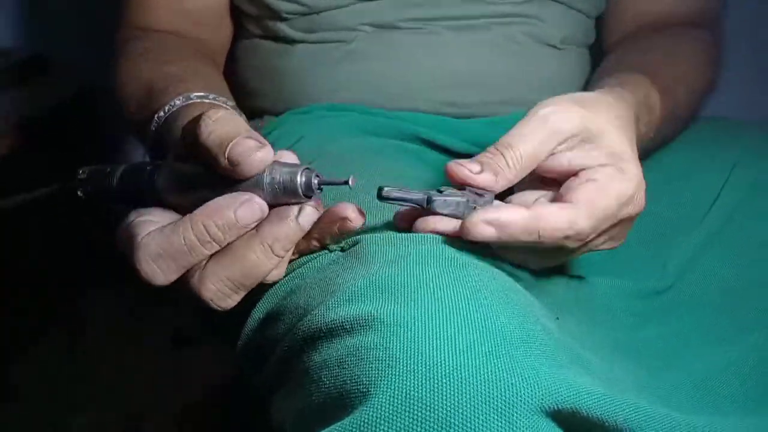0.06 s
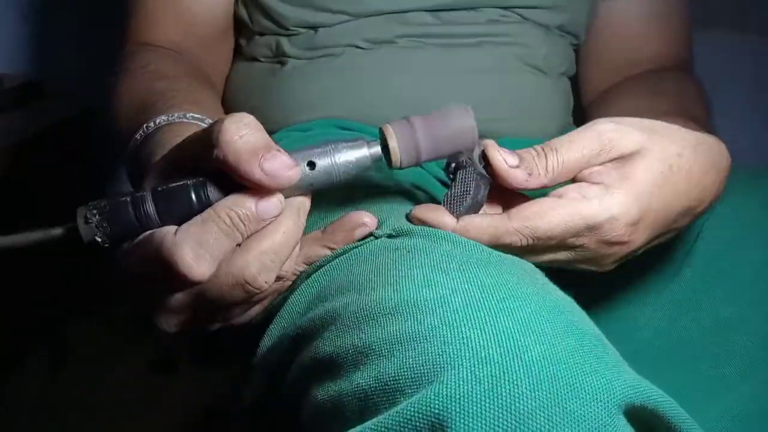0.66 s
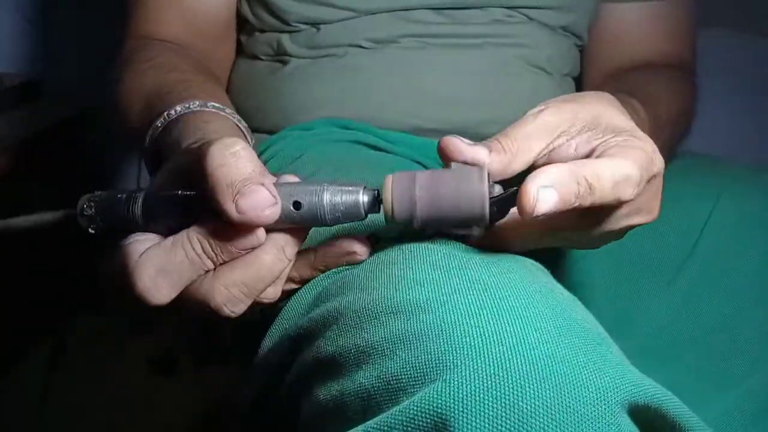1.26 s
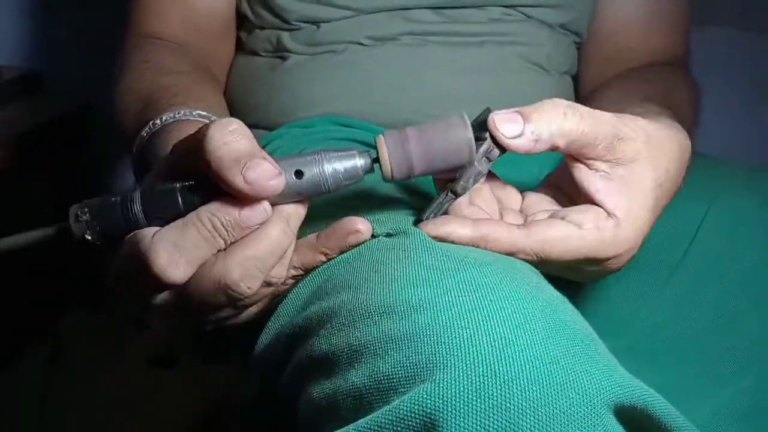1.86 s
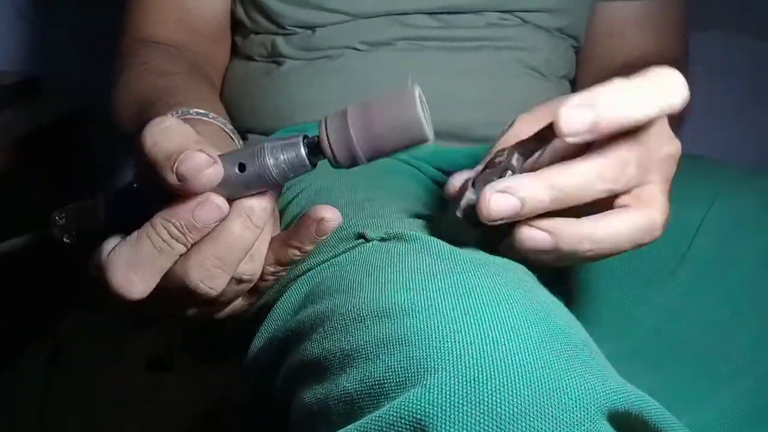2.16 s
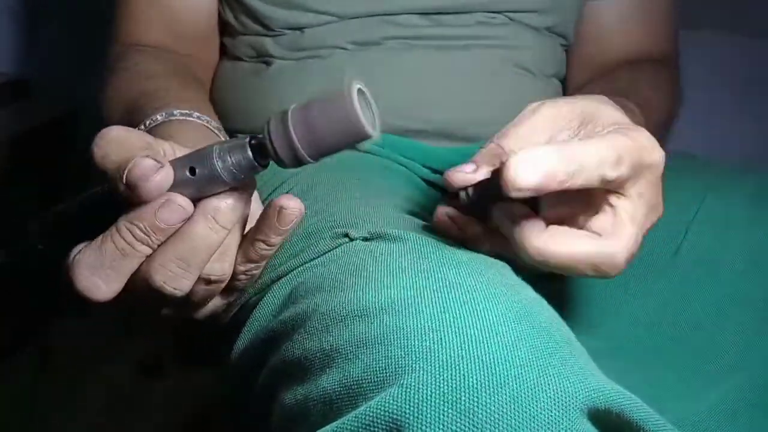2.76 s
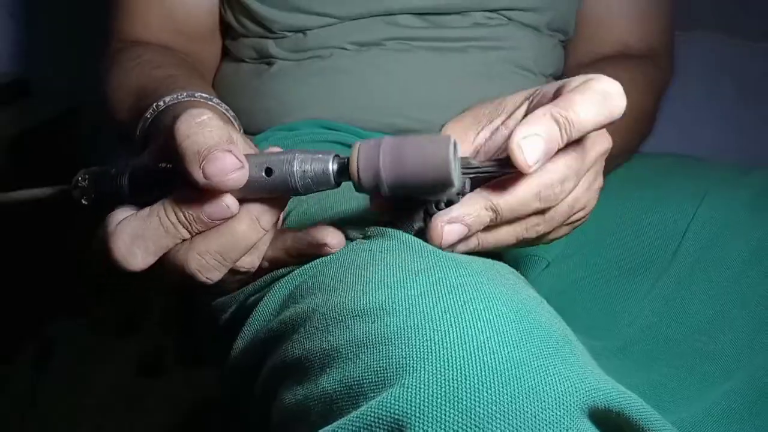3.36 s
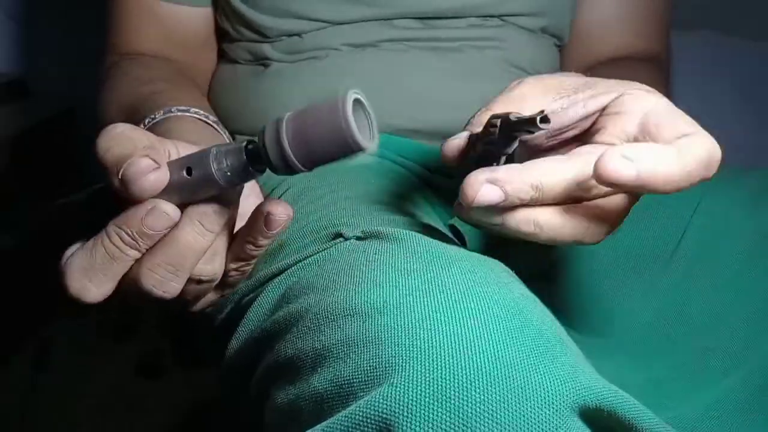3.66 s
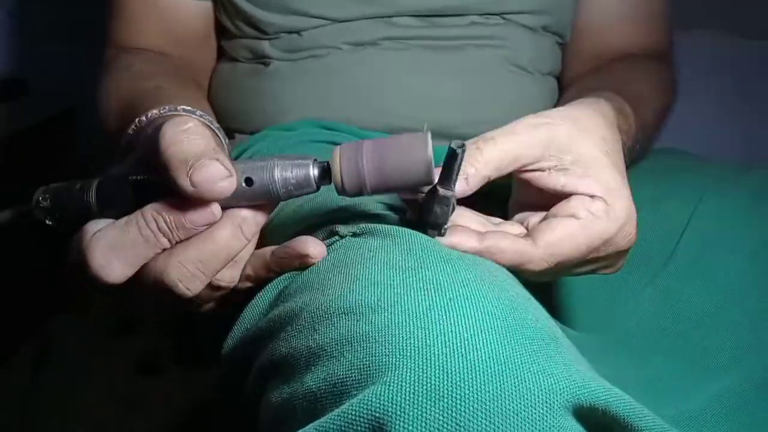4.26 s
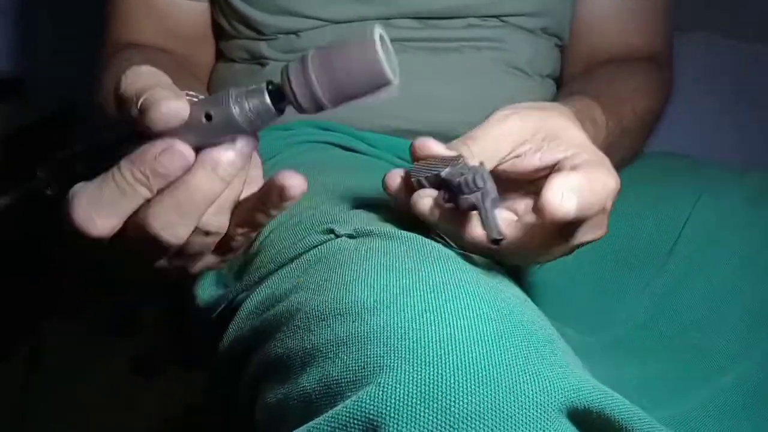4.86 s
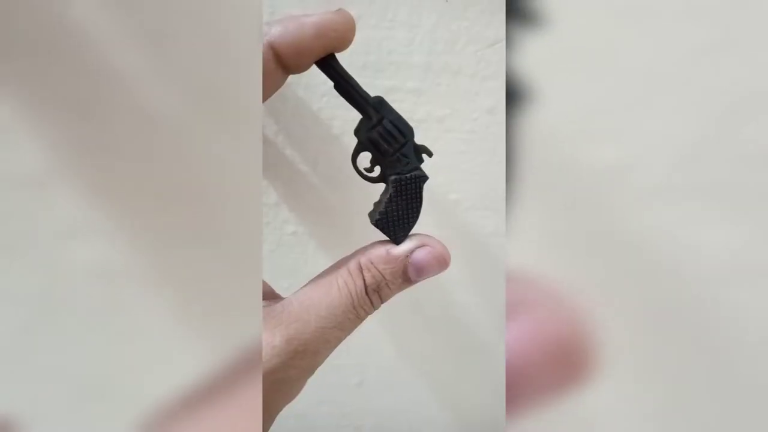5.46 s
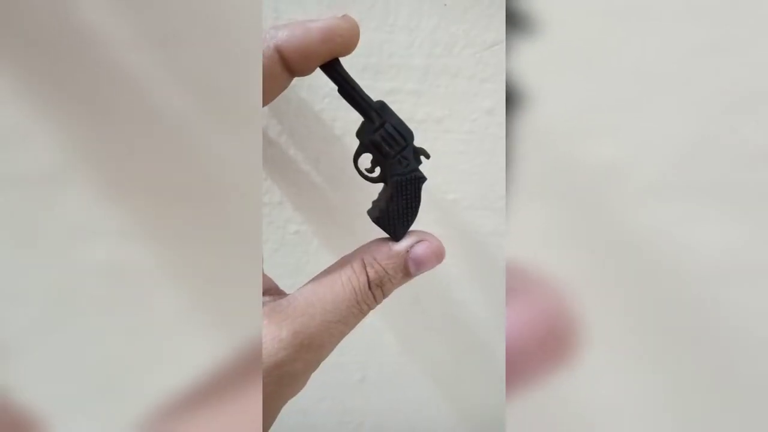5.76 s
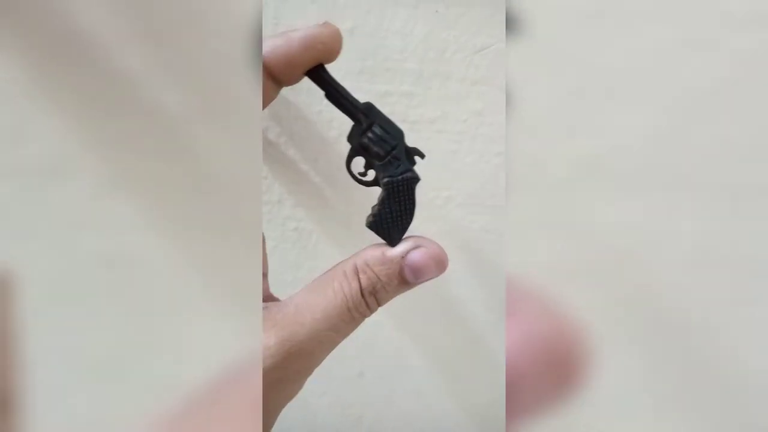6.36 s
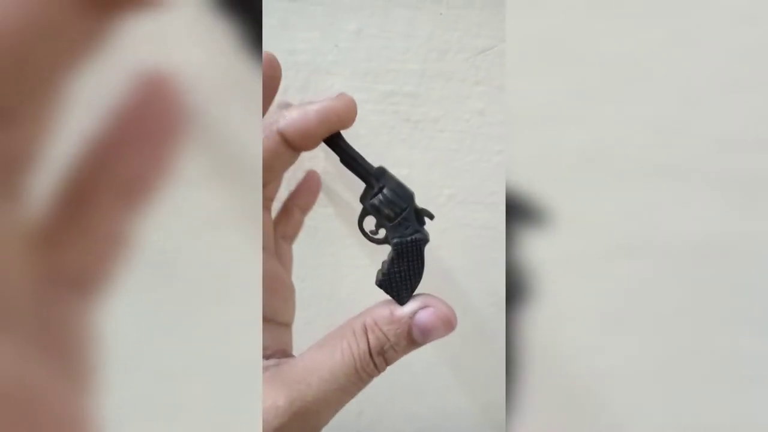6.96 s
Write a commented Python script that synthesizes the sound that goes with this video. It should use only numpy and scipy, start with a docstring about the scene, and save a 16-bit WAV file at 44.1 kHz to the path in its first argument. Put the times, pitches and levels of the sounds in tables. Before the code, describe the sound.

A handheld rotary tool is already running close to the microphone, with a thin wavering whine, an airy whirr and a low throb that pulses a few times a second. Almost at once its sanding drum meets a small wooden carving and adds a gritty, hissing rasp. Short high squeals and ringing squeaks come as the edges touch the drum, clearest around 0.2, 1.2 and 2 seconds, and tiny sharp scratches are scattered throughout. The strokes crowd together and bite a little harder between 3 and 3.6 seconds. At about 5 seconds the tool cuts off abruptly, without winding down. A much quieter room fades in, with soft air and a steady low hum. One soft, low handling bump comes at about 5.5 seconds, and the hum carries on until about 7 seconds.

```python
"""A handheld rotary tool spins a sanding drum against a small wooden carving, close by.
The motor throbs, drones and whines, its housing rings, and air and brushes whirr.
The drum's grit rasps once a turn and now and then snags; the carving rings and squeals at its edges.
The tool cuts off abruptly, and a quiet room with a low hum and one soft bump fades in."""
import sys
import numpy as np
from scipy import signal
from scipy.fft import rfft, irfft, next_fast_len
from scipy.io import wavfile

SR = 44100
rng = np.random.default_rng(int(sys.argv[2]) if len(sys.argv) > 2 else 0)


def master_out(mix):
    """Clip the mix to full scale and print it as 16-bit PCM to the path in sys.argv[1]."""
    frames = np.transpose(np.atleast_2d(mix))
    ceiling = np.clip(frames, -1, 1)
    pcm = np.round(ceiling * 32767).astype(np.int16)
    wavfile.write(sys.argv[1], SR, pcm)


N = 308687
TIME = np.arange(N) / SR
TOUCH_S, TOOL_OFF_S, ROOM_ON_S = 0.12, 4.972, 5.062


def gain_of(db):
    """Decibels to gain."""
    return 10 ** (np.asarray(db) / 20)


def unit_rms(x):
    """Scales to rms 1."""
    return x / np.sqrt(np.mean(x ** 2) + 1e-20)


def curve(rows):
    """Joins (seconds, value) points with straight lines."""
    return np.interp(TIME, *np.transpose(rows))


def noise():
    """White noise."""
    return rng.standard_normal(N)


def filtered(x, response):
    """Filters by a gain that is a function of frequency; rms 1."""
    size = next_fast_len(N)
    hz = np.fft.rfftfreq(size, 1 / SR)
    return unit_rms(irfft(rfft(x, size) * response(hz), size)[:N])


def coloured(x, spectrum):
    """Shapes x by (Hz, dB) points; rms 1."""
    hz, db = np.transpose(spectrum)
    return filtered(x, lambda f: gain_of(np.interp(np.log(f + 1), np.log(hz), db)))


def resonance(x, hz, width_hz):
    """A resonance with steep skirts; rms 1."""
    return filtered(x, lambda f: 1 / (1 + 1j * (f - hz) / (.78 * width_hz)) ** 2)


def wander(rate_hz):
    """Smooth random motion up to about rate_hz; rms 1."""
    return filtered(noise(), lambda f: np.exp(-(f / rate_hz) ** 2))


def tone(hz):
    """A sine of rms 1 on a pitch curve."""
    cycles = np.cumsum(hz * np.ones(N)) / SR
    return np.sqrt(2) * np.sin(2 * np.pi * (cycles + rng.random()))


def unsteady(hz, stray_hz, rate_hz, shake_db):
    """A tone whose pitch and level waver; rms 1."""
    return unit_rms(tone(hz + stray_hz * wander(rate_hz)) * gain_of(shake_db * wander(rate_hz)))


def patchy(x, depth_db, span_hz, span_s):
    """Random patches of the spectrum swell and fade; rms 1."""
    hz, t, spectrum = signal.stft(x, SR, nperseg=512, noverlap=384)
    per_hz = np.fft.fftfreq(len(hz), hz[1])[:, None]
    per_s = np.fft.rfftfreq(len(t), t[1])
    blur = np.exp(-(2 * per_hz * span_hz) ** 2 - (2 * per_s * span_s) ** 2)
    speckle = rng.standard_normal(spectrum.shape)
    patches = unit_rms(np.fft.irfft2(np.fft.rfft2(speckle) * blur, spectrum.shape))
    _, out = signal.istft(spectrum * gain_of(depth_db * patches), SR, nperseg=512, noverlap=384)
    return unit_rms(out[:N])


def once_a_turn(turns, sharpness):
    """A brief pulse, 0 to 1, on every revolution."""
    return np.exp(sharpness * (np.cos(2 * np.pi * turns) - 1))


def add(mix, start_s, sound):
    """Mixes a sound in at start_s."""
    start = round(start_s * SR)
    sound = sound[max(-start, 0):]
    part = mix[max(start, 0):][:len(sound)]
    part += sound[:len(part)]


def swells(rows):
    """Narrow noise bands that each swell and fade once."""
    t, out = np.arange(SR // 2) / SR - .25, np.zeros(N)
    for centre_s, half_s, hz, width_hz, db in rows:
        pole = np.exp(-np.pi * 1.5 * width_hz / SR)
        complex_noise = rng.standard_normal((len(t), 2)) @ [1, 1j]
        baseband = signal.lfilter([1], [1, -2 * pole, pole * pole], complex_noise)
        band = unit_rms((baseband * np.exp(2j * np.pi * hz * t)).real)
        add(out, centre_s + t[0], gain_of(db) * np.exp(-(t / half_s) ** 2) * band)
    return out


# Throb-to-drone beat. Each row: time in seconds, rate in Hz.
BEAT_HZ = [(0, 2.4), (.2, 4.2), (1.0, 4.4), (1.5, 5.3), (1.85, 4.6), (2.1, 2.0), (2.5, 3.4), (3.2, 4.0),
           (3.5, 2.8), (4.2, 3.2), (4.96, 4.3)]
# Throb. Each row: time in seconds, mean level in dB.
THROB_DB = [(0, -42.5), (.4, -36), (.65, -35), (.88, -44.5), (1.25, -35), (2.1, -41), (3.2, -36),
            (4.96, -35.5)]


def vibration(throb_swing_db=4, drone_db=-35, drone_swing_db=2.5):
    """The motor's vibration beats back and forth between a low throb and a drone."""
    beat = np.cos(2 * np.pi * np.cumsum(curve(BEAT_HZ)) / SR)
    throb = unsteady(hz=105.5, stray_hz=5, rate_hz=15.5, shake_db=1.9)
    drone = unsteady(hz=356, stray_hz=5.56, rate_hz=22.8, shake_db=3.5)
    throb *= gain_of(curve(THROB_DB) - throb_swing_db * beat)
    drone *= gain_of(drone_db + drone_swing_db * beat)
    return throb + drone


# Motor whines. Each row: pitch in Hz, rms stray in Hz, level in dB.
WHINES = [(1258, 8.83, -52.5), (2483, 24.6, -42), (2847, 32, -46), (3434, 16.08, -38.5), (5870, 24, -48)]
# Lowest whine's swells. Each row: centre and half length in seconds, pitch and width in Hz, level in dB.
WHINE_SWELLS = [(.3, .05, 1250, 25, -36), (1.08, .05, 1260, 25, -38), (3.55, 0.057, 1257, 25, -36.5),
                (4.52, 0.037, 1270, 25, -39)]


def whine():
    """Thin wavering motor tones; the lowest swells now and then."""
    tones = sum(gain_of(db) * unsteady(hz, stray_hz, rate_hz=35.1, shake_db=4.0)
                for hz, stray_hz, db in WHINES)
    return tones + swells(WHINE_SWELLS)


# Housing resonances. Each row: frequency in Hz, width in Hz, level in dB.
HOUSING_MODES = [(156, 30, -45.5), (287.8, 13.5, -41), (359, 34, -38), (482.5, 42, -43), (628.5, 30.3, -40),
                 (838, 180, -44), (1265, 26, -49.5), (1388, 33, -49), (2530, 130, -43.5), (2847, 160, -40),
                 (3460, 220, -40), (5700, 300, -51)]


def housing():
    """The motor's housing rings at its resonances."""
    return sum(gain_of(db) * resonance(noise(), hz, width_hz) for hz, width_hz, db in HOUSING_MODES)


# Air and brush noise. Each row: frequency in Hz, relative density in dB.
WHIRR_SPECTRUM = [(20, -21), (55, -3), (130, -1.5), (320, -5), (420, -8.5), (680, -5), (1080, -11.5),
                  (1550, -9), (1950, -2), (2700, 1), (3600, -0.5), (4150, -12.5), (6600, -24), (15500, -36)]


def whirr(turns, level_db=-26, rise_db_per_s=0.12, waver_db=.5):
    """Air and brushes rush, rattling as the unbalanced shaft knocks in its bearing each turn."""
    air = patchy(coloured(noise(), WHIRR_SPECTRUM), depth_db=2.5, span_hz=70, span_s=0.021)
    knocks = 1 + 0.21 * once_a_turn(turns, sharpness=11)
    rattle = unit_rms(gain_of(1.1 * wander(450)) * knocks)
    return gain_of(level_db + rise_db_per_s * TIME + waver_db * wander(30)) * air * rattle


def flutter(depth_db, rate_hz=43.07):
    """Gain for a quick, even flutter in the tool's sound."""
    return gain_of(depth_db * np.cos(2 * np.pi * (rate_hz * TIME + 1 / 8)))


# Squeals. Each row: centre and half length in seconds, pitch and width in Hz, level in dB.
SQUEALS = [(.05, 0.054, 5480, 200, -42.5), (.22, 0.081, 2760, 220, -28.5), (.65, .03, 10800, 500, -42),
           (.78, 0.049, 9000, 500, -39.5), (1.19, 0.018, 4530, 150, -33), (1.87, .04, 10300, 700, -39),
           (1.99, 0.014, 2730, 100, -25.5), (2.35, 0.043, 4540, 160, -39.5), (3.53, 0.04, 4780, 160, -38.5),
           (3.9, 0.046, 11250, 450, -42)]


def squeals():
    """The carving's edge sings briefly against the drum."""
    return swells(SQUEALS)


def grit(turns, cracks_per_s=9000, spread_db=3.0, high_spot=0.96, uneven_db=4.5):
    """Tiny fractures of wood, strongest when the drum's high spot comes round."""
    size = gain_of(spread_db * np.minimum(rng.exponential(1, N), 4))
    cracks = size * rng.choice([-1, 1], N) * (rng.random(N) < cracks_per_s / SR)
    bite = once_a_turn(turns, sharpness=10) * gain_of(uneven_db * wander(90))
    return unit_rms((unit_rms(cracks) + 0.71 * noise()) * (1 + high_spot * bite))


# Rasp colour. Each row: frequency in Hz, relative density in dB.
RASP_SPECTRUM = [(300, -15), (1500, -9.5), (3000, 7.5), (4100, -3.5), (5100, -3), (5900, 5.5), (6600, -6),
                 (7500, 0), (8500, 2.5), (9100, 4.5), (10200, -1), (10900, -12), (12700, -7.5), (14400, -6),
                 (15600, -11)]
# Drum and shank resonances. Each row: frequency in Hz, width in Hz, level in dB re the rasp.
SHANK_MODES = [(8130, 220, -13), (11420, 260, -19.5), (13500, 300, -19)]
# Pressure on the drum. Each row: time in seconds, rasp level in dB.
PRESSURE_DB = [(.14, -33.5), (.31, -33), (.37, -36), (1.0, -37), (1.15, -34.5), (2.2, -35), (2.6, -34),
               (3.23, -34.5), (3.37, -29.5), (3.44, -34.5), (3.58, -33), (3.7, -37), (3.8, -34),
               (4.25, -33.5), (4.96, -36)]


def rasp(turns, scrape):
    """Grit rasps and rings the shank; the colour changes as the contact point shifts."""
    shank = sum(gain_of(db) * resonance(scrape, hz, width_hz) for hz, width_hz, db in SHANK_MODES)
    cutting = coloured(grit(turns), RASP_SPECTRUM)
    return gain_of(curve(PRESSURE_DB)) * patchy(cutting + shank, depth_db=3, span_hz=170, span_s=0.02)


# Edge strokes. Each row: centre and half length in seconds, ring gain in dB, squeak level in dB.
STROKES = [(0.177, 0.049, -37, -42), (0.317, 0.029, -36, -40), (.77, .05, -42, -51),
           (1.18, 0.046, -38, -40), (1.55, 0.071, -45, -41), (1.73, .03, -38, -44), (1.863, .05, -52, -43),
           (1.958, .04, -42, -41), (2.108, .025, -38, -43), (2.34, .04, -33, -52), (2.516, .025, -34, -38),
           (3.052, 0.094, -38.5, -49), (3.22, .05, -36, -45), (3.356, .06, -35, -38.5),
           (3.46, .035, -36.5, -41), (3.554, .035, -34, -42), (3.912, .05, -50, -44.5),
           (4.225, 0.022, -34.5, -45), (4.281, .03, -34, -44), (4.52, .025, -37, -46),
           (4.71, .03, -38, -55), (4.83, .03, -36, -52)]
# Carving resonances. Each row: frequency in Hz, width in Hz, relative level in dB.
CARVING_MODES = [(4420, 280, -1.5), (4670, 160, -4.5)]


def strokes(scrape, ring_rest_db=-56, squeak_rest_db=-50.5):
    """Each stroke over the drum rings the carving and squeaks at its edge."""
    ring_gain, squeak_gain = gain_of(ring_rest_db), gain_of(squeak_rest_db)
    for centre_s, half_s, ring_db, squeak_db in STROKES:
        stroke = np.exp(-np.minimum(((TIME - centre_s) / half_s) ** 2, 20))
        ring_gain = np.maximum(ring_gain, gain_of(ring_db) * stroke)
        squeak_gain = np.maximum(squeak_gain, gain_of(squeak_db) * stroke)
    ring = sum(gain_of(db) * resonance(scrape, hz, width_hz) for hz, width_hz, db in CARVING_MODES)
    squeak = resonance(scrape, hz=11120, width_hz=1000)
    return ring_gain * ring + squeak_gain * squeak


def sanding(turns, onset_s=0.0044, tremor_db=1):
    """The drum meets the wood, held by a hand that is never quite steady."""
    scrape = grit(turns)
    contact = np.clip((TIME - TOUCH_S) / onset_s, 0, 1)
    return (rasp(turns, scrape) + strokes(scrape)) * contact * gain_of(tremor_db * wander(28))


# Snags. Each row: start in seconds, level in dB before trim, band centre in Hz.
SNAGS = [(0.4112, -19, 11500), (1.3147, -15.5, 9030), (1.6175, -16, 7990), (1.8295, -19, 10500),
         (2.5229, -31, 8620), (2.6008, -19, 7790), (2.97, -17, 8160), (3.1755, -19, 8150),
         (3.3376, -18, 8150), (3.732, -16.5, 7470), (4.1082, -19, 9390), (4.1552, -23, 7880),
         (4.3842, -20, 9600), (4.5703, -14.5, 9340)]


def snags(decay_s=0.0039, rise_s=0.00084, trim_db=-10, width_hz=2600):
    """Brief scratches where a coarse grain catches on an edge."""
    t, out = np.arange(SR // 20) / SR, np.zeros(N)
    envelope = np.exp(-t / decay_s) * (1 - np.exp(-t / rise_s))
    for start_s, db, hz in SNAGS:
        scratch = signal.lfilter(*signal.iirpeak(hz, hz / width_hz, SR), rng.standard_normal(len(t)))
        add(out, start_s, gain_of(db + trim_db) * unit_rms(scratch) * envelope)
    return out


# Room air. Each row: frequency in Hz, relative density in dB.
AIR_SPECTRUM = [(25, -26), (50, -3), (110, 1.5), (190, -3.5), (290, 2.5), (500, -7.5), (900, -7),
                (1350, -18.5), (1900, -15.5), (4100, -24), (5600, -38), (7600, -37.5), (9300, -27),
                (12500, -46.5)]
# Air fade-in. Each row: time in seconds, level in dB.
AIR_DB = [(5.07, -58.5), (5.31, -46), (5.43, -44.5), (5.725, -45.5), (5.75, -40.5), (7.0, -40.3)]
# Faint low swells. Each row: centre and half length in seconds, pitch and width in Hz, level in dB.
AIR_SWELLS = [(5.827, 0.042, 271, 80, -42), (6.513, 0.075, 291.5, 60, -40.5),
              (6.977, 0.033, 267, 110, -38.5)]


def room_air(whir_relative_db=-20, pulse_db=5, waver_db=0.66):
    """A soft, restless wash of air with a faint pulsing whir."""
    wash = patchy(coloured(noise(), AIR_SPECTRUM), depth_db=2.5, span_hz=60, span_s=0.048)
    whir = gain_of(whir_relative_db + pulse_db * wander(12)) * resonance(noise(), hz=1860, width_hz=120)
    return gain_of(curve(AIR_DB) + waver_db * wander(16)) * (wash + whir) + swells(AIR_SWELLS)


# Hum tones. Each row: frequency in Hz, level in dB at 0 dB gain.
HUM_TONES = [(48.5, -58.5), (78.6, -42), (146, -56), (290, -59), (587, -57.5)]
# Hum fade-in. Each row: time in seconds, gain in dB.
HUM_GAIN_DB = [(5.06, -23), (5.2, -13), (5.35, -2.5), (5.7, -2), (5.9, -1), (6.3, 0), (7, -1)]


def hum(waver_db=1.1):
    """A machine in the room hums at a steady pitch."""
    tones = sum(gain_of(db) * tone(hz) for hz, db in HUM_TONES)
    return tones * gain_of(curve(HUM_GAIN_DB) + waver_db * wander(11))


def bump(start_s=5.526, db=-29, modes_hz=(120, 180), decay_s=0.017, rise_s=0.0013):
    """A soft low knock of handling."""
    t, out = np.arange(SR // 4) / SR, np.zeros(N)
    modes = sum(np.sin(2 * np.pi * hz * t) for hz in modes_hz)
    envelope = np.exp(-t / decay_s) * (1 - np.exp(-t / rise_s))
    add(out, start_s, -gain_of(db) * modes * envelope)
    return out


def scene(turns_per_s=155, jitter=0.0442, drift=.035, cutoff_s=0.0018, fade_in_s=0.028):
    """The tool until it cuts off, then the room."""
    speed = turns_per_s * (1 + jitter * wander(43.7) + drift * wander(5))
    turns = np.cumsum(speed) / SR
    motor = vibration() + whine() + housing() + whirr(turns)
    wood = squeals() + sanding(turns) + snags()
    tool = motor * flutter(depth_db=1.0) + wood * flutter(depth_db=1.13)
    room = room_air() + hum() + bump()
    running = np.exp(-np.maximum(TIME - TOOL_OFF_S, 0) / cutoff_s)
    fade_in = np.clip((TIME - ROOM_ON_S) / fade_in_s, 0, 1)
    return (tool * running + room * fade_in)[None]


def record(dry):
    """A steep low-pass removes the highest treble."""
    lowpass = signal.firwin(511, cutoff=15580, window=("kaiser", 9), fs=SR)
    return signal.oaconvolve(dry, lowpass[None], "same")


dry = scene()
out = record(dry)
master_out(out)
```